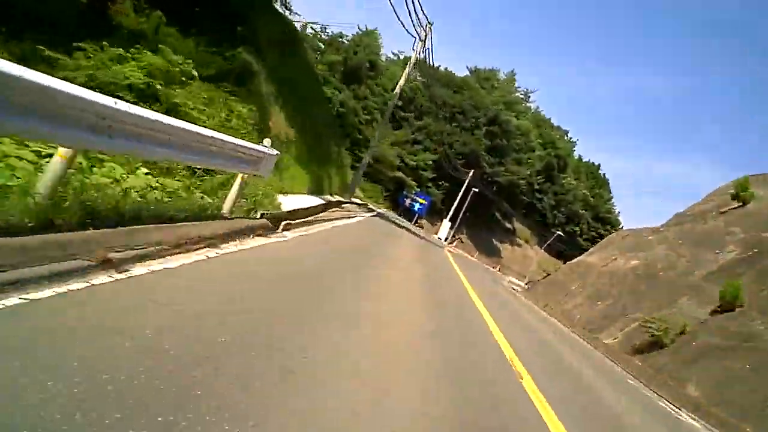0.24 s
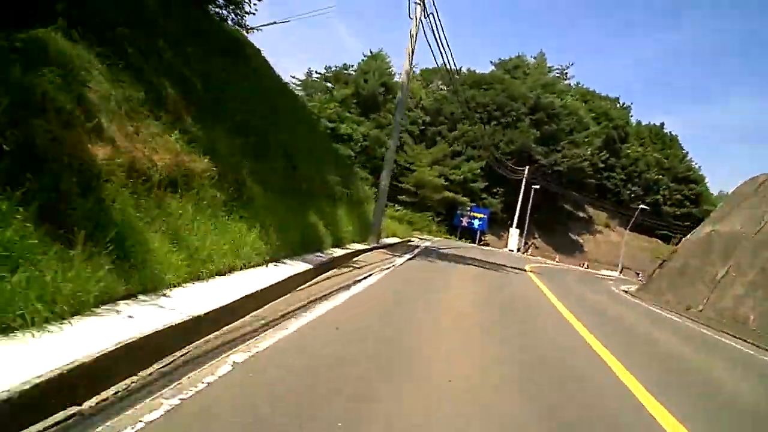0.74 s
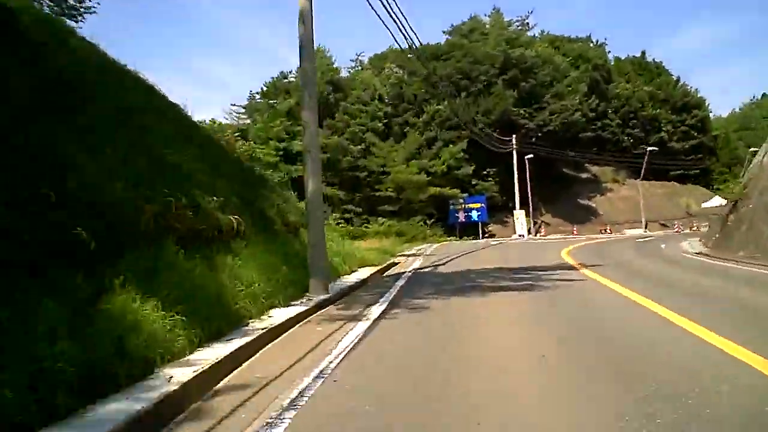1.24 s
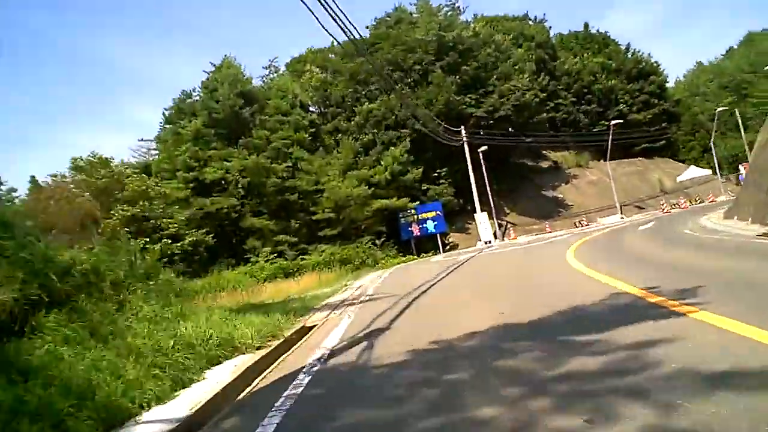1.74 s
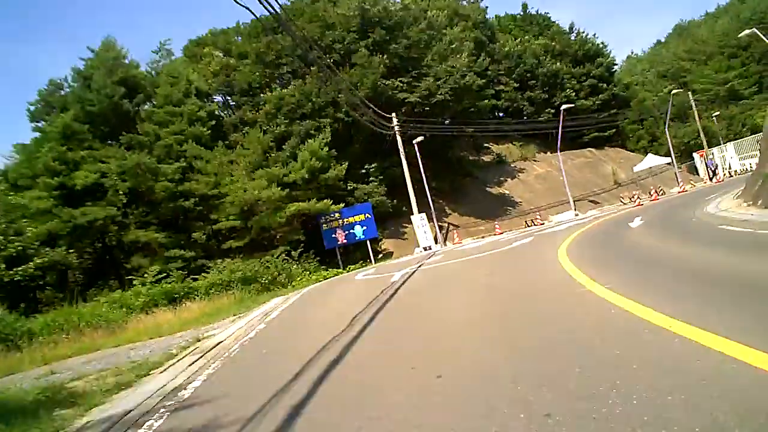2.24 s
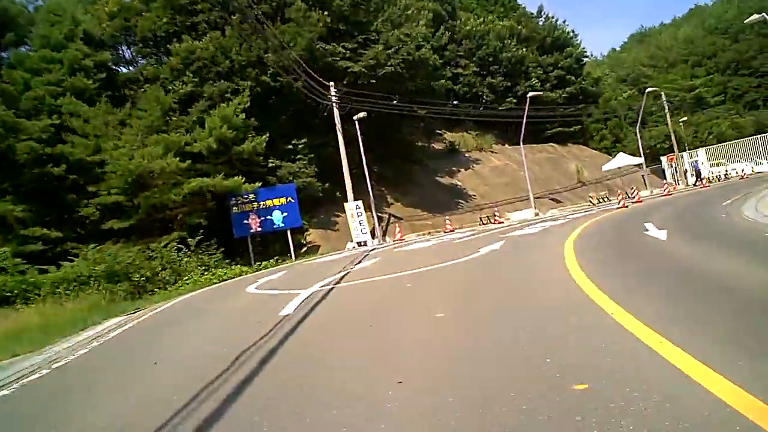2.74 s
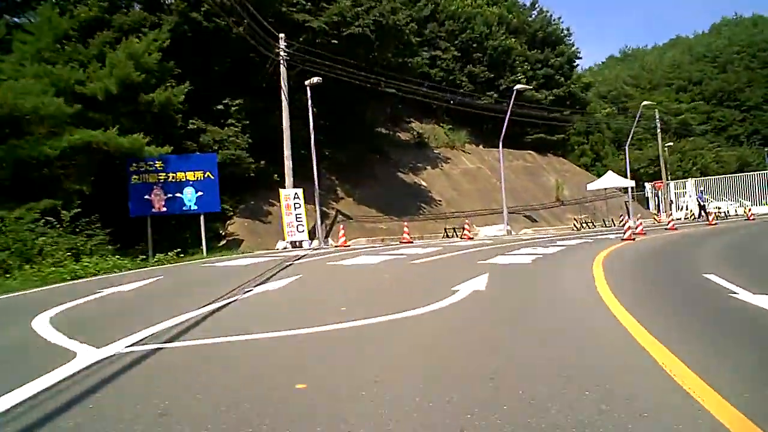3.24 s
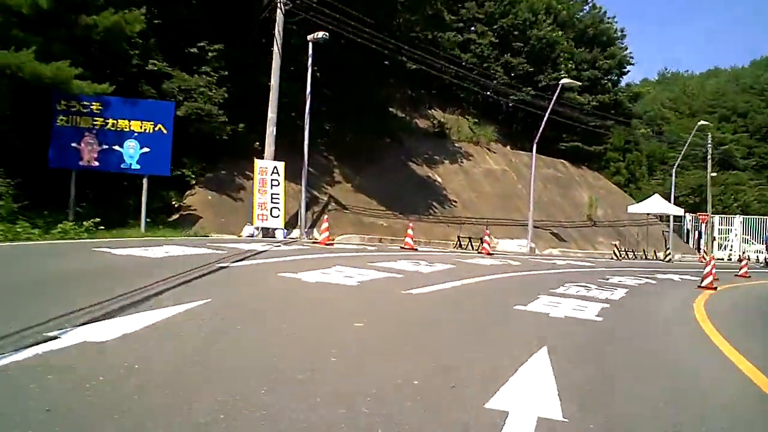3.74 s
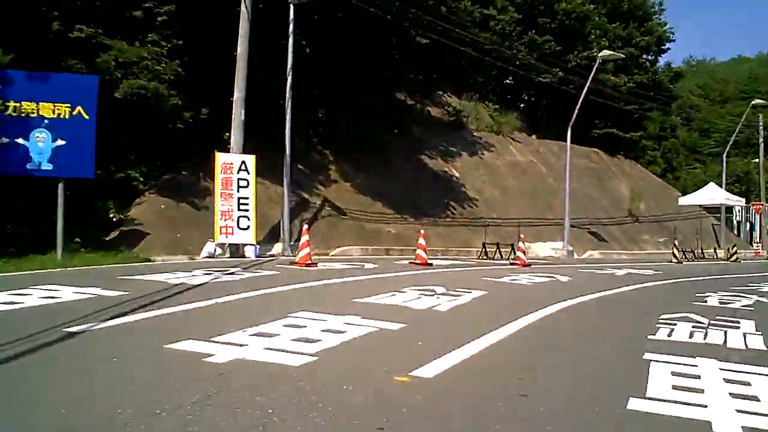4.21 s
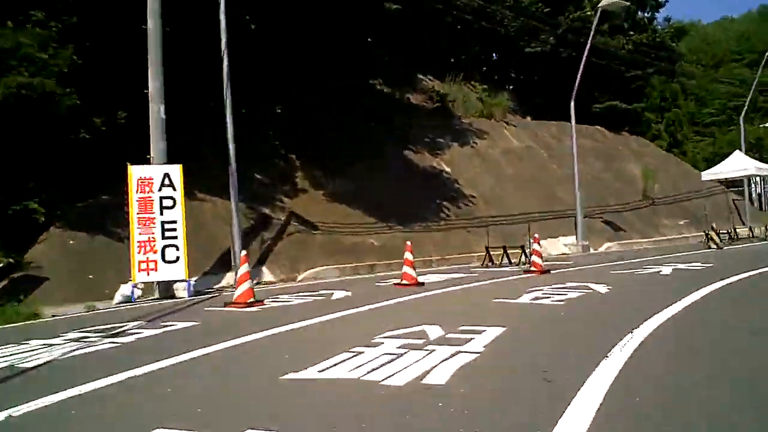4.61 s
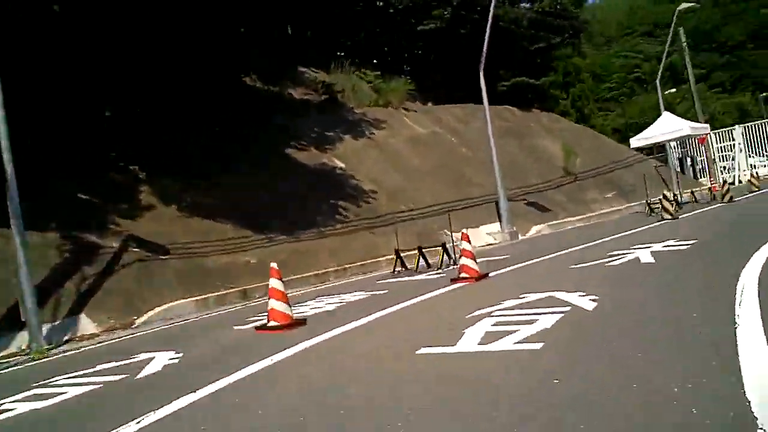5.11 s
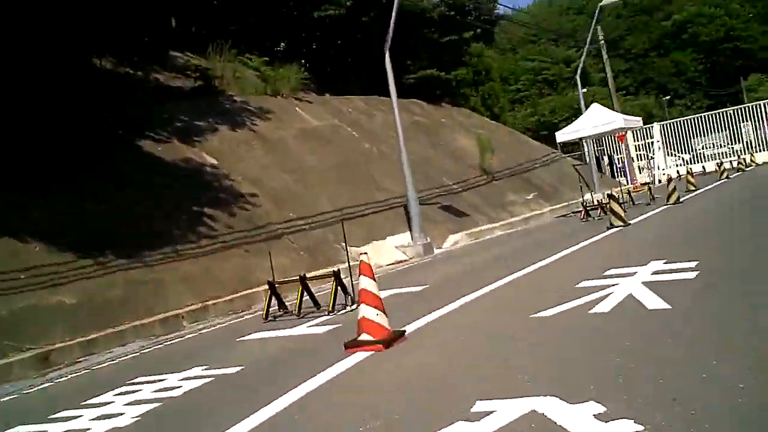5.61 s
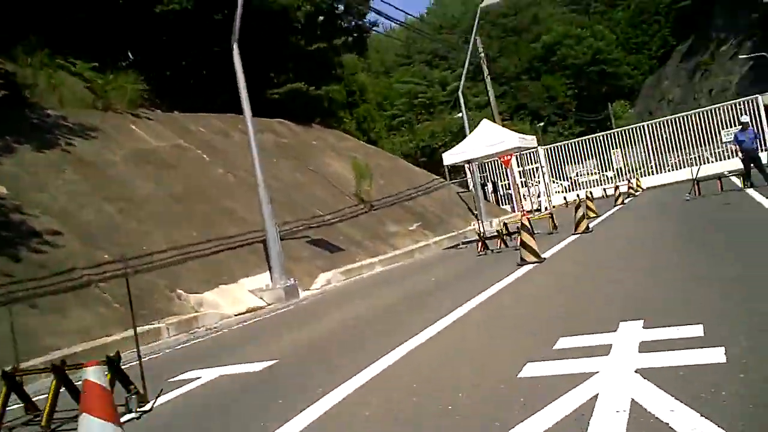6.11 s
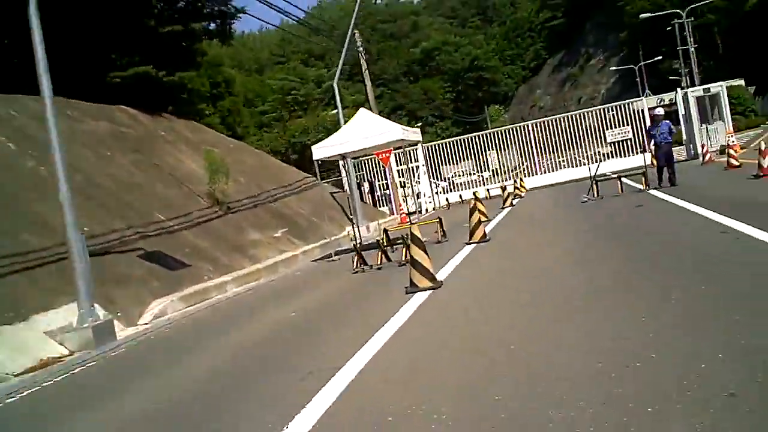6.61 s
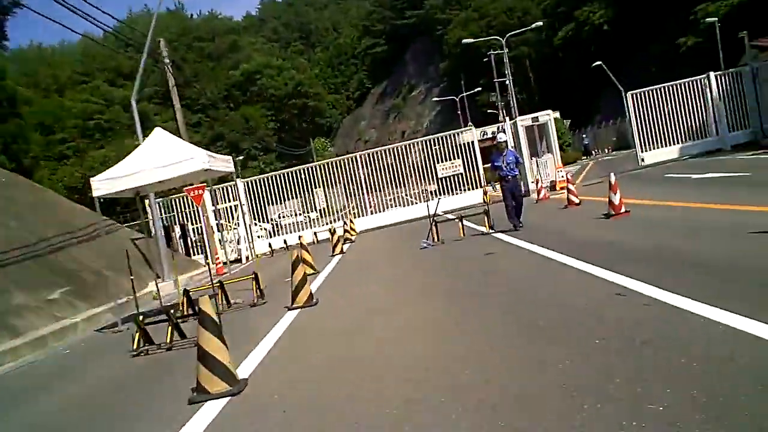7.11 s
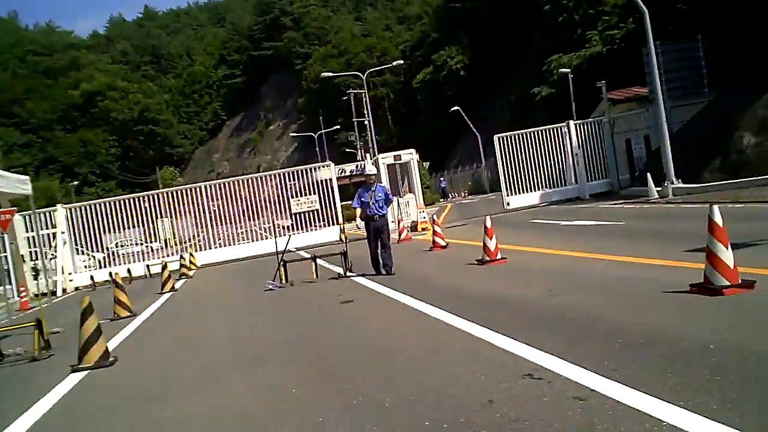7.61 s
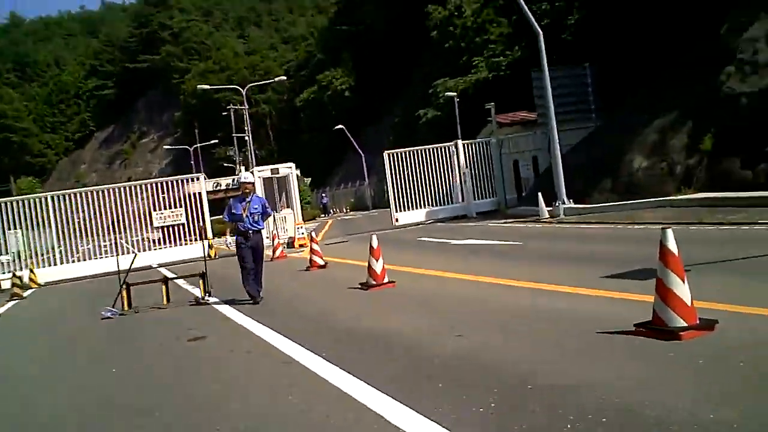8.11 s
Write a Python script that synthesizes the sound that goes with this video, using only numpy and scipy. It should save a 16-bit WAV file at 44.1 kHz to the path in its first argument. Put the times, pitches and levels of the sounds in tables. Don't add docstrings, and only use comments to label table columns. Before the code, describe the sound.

A twin-cylinder motorcycle slows from windy coasting to a low pulsing idle, with rattles, two shift clunks, a faint brake hum and a pebble ping.

```python
import sys
import numpy as np
from scipy import signal
from scipy.fft import rfft, irfft, next_fast_len
from scipy.io import wavfile
from scipy.ndimage import uniform_filter1d, map_coordinates

SR = 44100
rng = np.random.default_rng(int(sys.argv[2]) if len(sys.argv) > 2 else 0)


def pcm_store(signal):
    levels = np.round(np.clip(np.atleast_2d(signal), -1, 1) * 32767)
    wavfile.write(sys.argv[1], SR, levels.astype(np.int16).T)


def magnitude_from_level(level_db):
    exponent = np.asarray(level_db, float) / 20
    return 10 ** exponent


N = 368235

# [f/Hz, level/dB]
FRAME_SHAKE = [(15, -13), (60, 3), (120, 1), (400, -62)]
FRAME_DB = -76
# [t/s, peak level/dB]
SEAMS = [(.0992, -46), (.2379, -39.5), (.4684, -46), (.6659, -52), (1.1149, -48), (1.3918, -50.5),
         (1.7674, -51), (1.9924, -51), (2.0844, -44), (2.685, -48), (2.869, -47.5), (2.9149, -50.5),
         (4.0702, -49), (4.347, -49), (4.9012, -49), (4.9856, -50), (5.2704, -51.5), (5.3636, -48),
         (5.8242, -50), (6.0545, -48.5), (8.0401, -49.5), (8.3183, -50)]
BLOCK, FIRST_SEAM = 2036, 370
PORT_HZ = 105.4

# [t/s, buffet level/dB]
HEADWIND = [(0, -31), (.7, -34.5), (1.3, -35), (2, -34.5), (2.4, -38.5), (3.4, -40.5), (4.4, -43),
            (5.3, -46), (5.75, -54.5), (8.35, -50.5)]
# [t/s, level over the headwind/dB, half length/s]
GUSTS = [(0, 2.5, 0.019), (0.104, 1, 0.058), (0.507, 4, 0.053), (0.843, 3, 0.13), (1.39, 1.5, 0.033),
         (1.93, 2, 0.044), (2.1, 2.5, .04), (2.6, 6.5, 0.033), (2.828, 6.5, 0.089), (3.027, 6, 0.19),
         (3.913, 3.5, 0.034), (4.083, 3, 0.037), (5.115, 2.5, 0.091)]
# [f/Hz, level/dB per Hz]
BUFFET = [(25, -20), (70, -14.5), (120, -4.5), (207, -0.5), (318, 1), (520, -3), (1080, -12.5),
          (1860, -20.5), (2500, -27), (4000, -40), (6000, -63), (9000, -82)]
# [t/s, peak level/dB]
SLAPS = [(.045, -10), (.079, 1), (.123, -11), (.163, -4.5), (.189, -7), (.283, -20), (.361, -13),
         (.434, -11), (.664, -6.5), (.778, -14), (.819, -4.5), (.909, -8), (1.137, -6), (1.217, -5.5),
         (1.331, -13), (1.497, -15), (1.564, -15), (2.172, -7.5), (2.869, -17), (3.13, -12), (3.182, -7.5),
         (3.351, -13), (3.894, -14), (4.068, -14), (4.281, -21), (4.977, -19), (5.077, -24)]

# [t/s, peak level/dB]
RATTLE = [(.0797, -34), (.111, -41), (.1301, -41), (.195, -42), (.2473, -43), (.2828, -37), (.3065, -42),
          (.364, -42), (.4384, -38), (.4539, -40), (.6484, -41), (.6664, -38), (.7477, -37), (.879, -40),
          (.957, -38), (1.0331, -34), (1.1094, -44), (1.4611, -40), (1.4721, -39), (1.6487, -44),
          (1.8068, -38), (1.94, -33), (2.4872, -39), (2.6209, -41)]
RATTLE_HZ, RATTLE_SPREAD, RATTLE_T60 = 3900, .04, .006
CHATTER_DB, CHATTER_SCATTER_DB, CHATTER_END_S = -11, 2.2, 2.7
# [t/s, level/dB, f/Hz, t60/s]
PEBBLE = [
    (7.2095, -42, 4100, .02),
    (7.2135, -44, 3880, .02),
    (7.2095, -47, 6700, .015),
    (7.2095, -48, 7050, .015),
    (7.211, -62, 7500, .05),
]
# [t/s, level/dB, t60/s]
SHIFT = [
    (4.2804, -32, .03),
    (4.282, -27.5, 0.018),
    (4.286, -30, .06),
    (4.985, -28.5, 0.075),
    (4.991, -36, 0.051),
    (5, -33, 0.021),
]
# [f/Hz, level/dB per Hz]
GEARBOX = [(60, -60), (300, -7), (700, 2), (1700, -8), (2600, -7), (3400, -27), (6000, -30.5), (8000, -55)]

# [t/s, level/dB]
ROAD = [(0, -33), (.9, -35), (1.7, -35), (2.65, -38), (3, -38), (3.5, -39.5), (4.7, -42.5), (5.2, -40.5),
        (7.4, -38), (8.35, -36.5)]
# [f/Hz, level/dB per Hz]
ROAR = [(250, -24), (420, -15), (527, -6.5), (630, 0.5), (824, -2), (1100, -3.5), (1350, -9.5), (1680, -19),
        (2000, -17), (2900, -17.5), (3300, -26.5), (4400, -37.5), (6500, -42.5), (9000, -62)]

# [t/s, four-stroke cycles gone]
CRANK = [(-.1, -74), (0, -72), (2.5, -28), (4.1, -7.9), (4.85, .1), (5.35, 5.26), (5.85, 10.48),
         (6.35, 15.74), (6.85, 20.92), (7.35, 26.05), (7.85, 31.19), (8.35, 36.28)]
# [t/s, throttle 0-1, coasting gear share 0-1]
LOAD = [(0, 0, 0), (2.2, .05, 0.3), (3, 0, 0.8), (4.6, 0.44, 0.55), (5.4, 0.3, 0.5), (6, 0.45, 0.3),
        (7.3, 0.82, 0.2), (8.35, 0.8, 0)]
# [f/Hz, width/Hz, level/dB]
COAST = [(1735, 28, 24), (3610, 37, 16), (5880, 500, 4.5)]
# [place 0-1, cover blow/dB, case blow/dB, bright hiss/dB, hiss length/s]
VALVES = [(.0, -14, -14, -2, .008), (.21, 3, -2, -12, .002), (.36, -6, -8, -5, .005),
          (.51, -1, -14, -4, .003), (.63, 0, -7, 3, .003), (.69, -5, 2, -3, .003),
          (.72, -14, -4, -12, .002), (.815, -6, -10, 2, .009)]
# [f/Hz, width/Hz, level/dB]
CASE = [(2200, 30, -6), (2390, 28, 0), (2562, 16, 0), (2955, 60, -10), (3350, 150, -18)]
# [f/Hz, width/Hz, level/dB]
COVER = [(950, 183, 0), (1673, 157, 2.5)]
# [f/Hz, width/Hz, level/dB]
BRIGHT = [(3940, 500, 3.5), (4880, 180, 3.5), (5120, 190, 2.5), (6270, 600, -3), (7700, 1500, -8.5)]
# [place 0-1, pipe f/Hz, swell/s, level/dB]
EXHAUST = [(.91, 301, 0.0039, -2.5), (.365, 305, 0.0032, -1), (0.3, 278, 0.0029, -11.5),
           (0.6, 253, 0.0016, -11), (0, 450, 0.0011, -2.5), (0.5, 478, 0.002, -14), (.93, 97, 0.0022, -10),
           (.42, 97, 0.0037, -11.5), (0.1, 111, 0.0028, -14)]
# [place 0-1, f/Hz, swell/s, level/dB]
INTAKE = [(.57, 190, .0045, 0), (.125, 186, .005, -8.5), (.36, 188, .004, -12), (.83, 184, .004, -11),
          (.62, 90, .003, -12)]
# (shut dB, dB per full throttle, dB per full coasting)
EXHAUST_DB, INTAKE_DB, VALVE_DB = (-46, 2.5, -6), (-52, 6, -1.5), (-9, 10, -0.5)
ROAR_REF_DB, CASE_DB, CASE_FOLLOWS, CASE_LOAD_DB = -35, -45, 0.46, -3.5
BRIGHT_DB = -65.5


def unit(x):
    return x / np.sqrt(np.mean(x ** 2) + 1e-20)


def curves(rows):
    s, *cols = np.transpose(rows)
    return [np.interp(np.arange(N) / SR, s, c) for c in cols]


def wobble(rate):
    knots = rng.standard_normal(int(N * rate / SR) + 4)
    return map_coordinates(knots, [np.arange(N) * rate / SR])


def filtered(x, response):
    m = next_fast_len(N + 8192)
    return irfft(rfft(x, m) * response(np.fft.rfftfreq(m, 1 / SR)), m)[..., :N]


def colour(points):
    f, v = np.transpose(points)
    return lambda hz: magnitude_from_level(np.interp(np.log(hz + 1), np.log(f + 1), v))


def body(modes):
    def response(f):
        total = 0
        for k, (c, w, db) in enumerate(modes):
            total = total + (-1) ** k * magnitude_from_level(db) * 1j * f * w / (c * c - f * f + 1j * f * w)
        return total
    return response


def rush(spectrum, patchy_db):
    z = signal.stft(rng.standard_normal(N), nperseg=512)[2]
    field = uniform_filter1d(rng.standard_normal(z.shape), size=5, axis=0)
    field = uniform_filter1d(field, size=6, axis=1)
    noise = signal.istft(z * magnitude_from_level(patchy_db * unit(field)), nperseg=512)[1][:N]
    return unit(filtered(noise, colour(spectrum)))


def headwind():
    t = np.arange(N) / SR
    return curves(HEADWIND)[0] + sum(db * np.exp(-((t - s) / half) ** 2) for s, db, half in GUSTS)


def wind():
    buffet_db = headwind()
    lumps = magnitude_from_level(1.1 * wobble(70) + 2.3 * wobble(170))
    flow = rush(BUFFET, patchy_db=0.25)
    deep = filtered(flow, lambda hz: 1 / (1 + (hz / 230) ** 4))
    eddies = unit(deep + lumps / lumps.mean() * (flow - deep))
    eddies = eddies - 0.19 * filtered(eddies ** 2, lambda hz: hz > 220)
    slaps, t = np.zeros(N + SR), np.arange(SR // 50) / SR - .002
    for s, db in SLAPS:
        swing = np.cos(2 * np.pi * rng.uniform(320, 710) * t)
        slaps[round(s * SR):][:len(t)] -= magnitude_from_level(db - 8.5) * np.exp(-(t / 0.00082) ** 2) * swing
    slaps = filtered(slaps[:N], lambda hz: 1 / (1 + (200 / (hz + 1)) ** 4))
    return magnitude_from_level(buffet_db + 4) * eddies + slaps


def drive_roar():
    return magnitude_from_level(curves(ROAD)[0] - 0.08 + 0.42 * wobble(30)) * rush(ROAR, patchy_db=0.7)


def mount_rattle():
    out, short = np.zeros(N + SR), SR // 50
    t = np.arange(short) / SR
    when = rng.uniform(size=90) ** 1.4 * CHATTER_END_S
    faint_db = headwind()[(when * SR).astype(int)] + CHATTER_DB
    faint_db = faint_db + CHATTER_SCATTER_DB * rng.standard_normal(len(when))
    for s, db in list(RATTLE) + list(zip(when, faint_db)):
        hz = RATTLE_HZ * (1 + RATTLE_SPREAD * rng.exponential())
        blow = magnitude_from_level(-60 * t / RATTLE_T60) * rng.standard_normal(short)
        blow[0] = 4
        crack = signal.lfilter(*signal.butter(2, [.72 * hz, 1.3 * hz], "band", fs=SR), blow)
        out[round(s * SR):][:short] += magnitude_from_level(db - 3.0) * crack / np.abs(crack).max()
    return out[:N]


def pebble():
    out, t = np.zeros(N + SR), np.arange(SR // 8) / SR
    for s, db, hz, t60 in PEBBLE:
        ring = magnitude_from_level(db - 60 * t / t60) * np.sin(2 * np.pi * hz * t)
        out[round(s * SR):][:len(t)] += ring * (1 - np.exp(-t / .0006))
    return out[:N]


def brake():
    start, attack, hold, release = 5.55, .05, .13, .2
    db, hz, sag = -45, 433, 65
    t = np.arange(N) / SR - start
    swell = np.clip(np.minimum(t / attack, (attack + hold + release - t) / release), 0, 1) ** 2
    return magnitude_from_level(db) * swell * np.sin(2 * np.pi * (hz * t - sag * t ** 2 / 2))


def gear_shifts():
    clunk, t = np.zeros(N + SR), np.arange(SR // 8) / SR
    for s, db, t60 in SHIFT:
        clunk[round(s * SR):][:len(t)] += magnitude_from_level(db + 13 - 60 * t / t60)
    return filtered(clunk[:N] * rng.standard_normal(N), colour(GEARBOX))


def loaded(rule_db):
    throttle, coasting = curves(LOAD)
    return rule_db[0] + rule_db[1] * throttle + rule_db[2] * coasting


def since(place, scatter_db):
    s, cycles = np.transpose(CRANK)
    turn = np.floor(curves(CRANK)[0] - place)
    passed = np.interp(turn + place, cycles, s)
    strength = magnitude_from_level(scatter_db * rng.standard_normal(200))
    return np.arange(N) / SR - passed, strength[turn.astype(int)]


def valve_blows():
    valve_db = loaded(VALVE_DB)
    shake, hiss = rng.standard_normal((2, N)), np.full(N, .45)
    for place, cover_db, ring_db, hiss_db, length in VALVES:
        t, size = since(place, scatter_db=2.4)
        contact = np.diff(t, prepend=0) < 0
        blow = magnitude_from_level(valve_db) * size * contact
        shake += blow * magnitude_from_level([[cover_db + 30], [ring_db + 35]])
        hiss += magnitude_from_level(hiss_db + valve_db + 1.5) * size * np.exp(-t / length)
    return shake[0], shake[1], hiss * rng.standard_normal(N)


def unloaded_gears():
    def ring(hz):
        return np.abs(body(COAST)(hz)) ** 1.34 / magnitude_from_level(np.interp(hz, [1745, 5900], [6, 0]))
    return unit(filtered(rng.standard_normal(N), ring))


def engine_metal():
    (roar_db,), (throttle, coasting) = curves(ROAD), curves(LOAD)
    case_db = CASE_DB + CASE_FOLLOWS * (roar_db - ROAR_REF_DB) + CASE_LOAD_DB * throttle
    case_db = case_db + 1.6 * wobble(2.88)
    bright_db = BRIGHT_DB + 0.92 * wobble(3.06)
    cover_blows, case_blows, hiss = valve_blows()
    cover = unit(filtered(cover_blows, body(COVER)))
    case = unit(filtered(case_blows, body(CASE)))

    def small_parts(hz):
        steep = hz ** 2 / (hz ** 2 + 3000 ** 2) / (1 + (hz / 8000) ** 8)
        return steep * body(BRIGHT)(hz)
    bright = np.sqrt(np.clip(1 - 0.92 * coasting, 0, 1)) * unit(filtered(hiss, small_parts))
    gears = magnitude_from_level(7.0) * np.clip(coasting, 0, 1) * unloaded_gears()
    return magnitude_from_level(roar_db - 10.5) * cover + magnitude_from_level(case_db - 3.5) * case + magnitude_from_level(bright_db - 2.0) * (bright + gears)


def breath(pulses, scatter_db):
    out = np.zeros(N)
    for place, hz, swell, db in pulses:
        t, size = since(place, scatter_db)
        shape = (t / swell) ** 3 * np.exp(-t / swell)
        out += magnitude_from_level(db) * size * shape * np.sin(2 * np.pi * hz * t)
    return unit(out)


def pipes():
    exhaust = magnitude_from_level(loaded(EXHAUST_DB)) * breath(EXHAUST, scatter_db=1)
    intake = magnitude_from_level(loaded(INTAKE_DB)) * breath(INTAKE, scatter_db=1.2)
    return exhaust + intake


def scene():
    passing = wind() + drive_roar() + mount_rattle() + pebble() + brake()
    engine = gear_shifts() + engine_metal() + pipes()
    return (passing + engine)[None]


def roll_off(x):
    return signal.sosfilt(signal.butter(12, 15830, fs=SR, output="sos"), x)


def record(dry):
    x = filtered(dry, lambda hz: (1j * hz / (PORT_HZ + 1j * hz)) ** 2)
    x = x + magnitude_from_level(FRAME_DB) * rush(FRAME_SHAKE, patchy_db=5)
    step = np.sqrt(np.abs(uniform_filter1d(np.gradient(x[0]) ** 2, size=60)))
    clicks, seam = np.zeros(N), np.arange(FIRST_SEAM, N, BLOCK)
    clicks[seam] = magnitude_from_level(-6) * step[seam] * rng.laplace(size=len(seam))
    for s, db in SEAMS:
        clicks[round(s * SR) + 30] += magnitude_from_level(db + 4.0)
    hiss = magnitude_from_level(-20.0) * step * rng.standard_normal(N)
    return roll_off(x + hiss + np.diff(clicks, prepend=0))


dry = scene()
out = record(dry)
pcm_store(out)
```